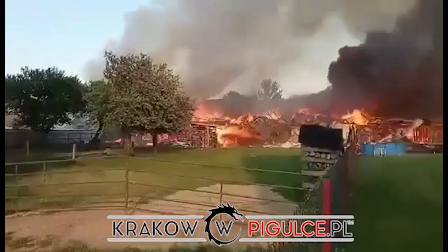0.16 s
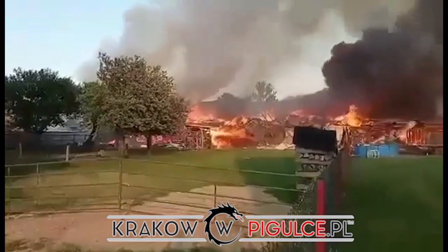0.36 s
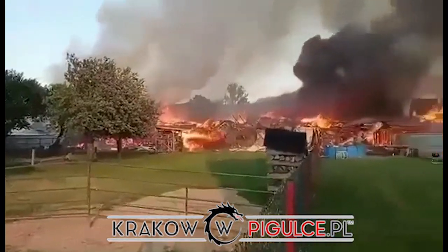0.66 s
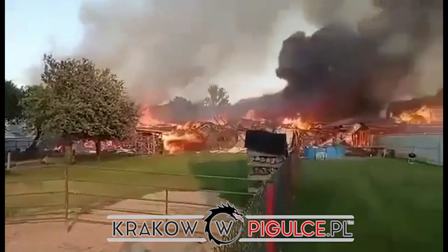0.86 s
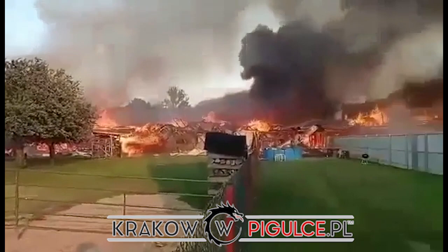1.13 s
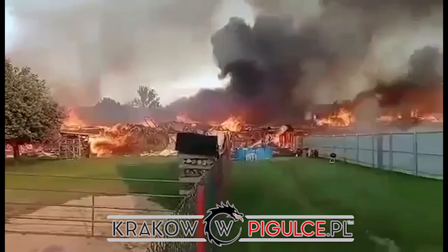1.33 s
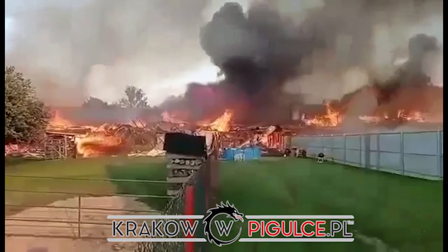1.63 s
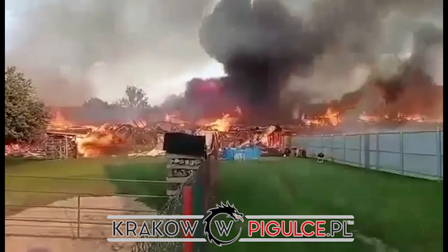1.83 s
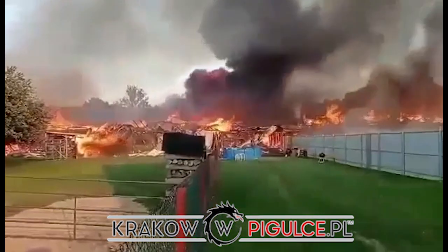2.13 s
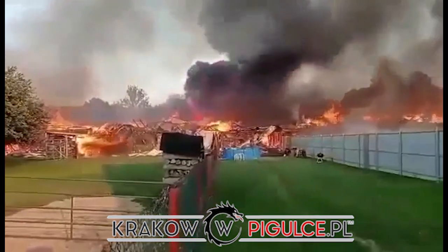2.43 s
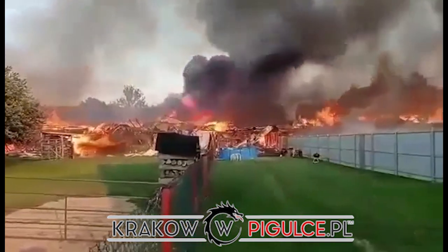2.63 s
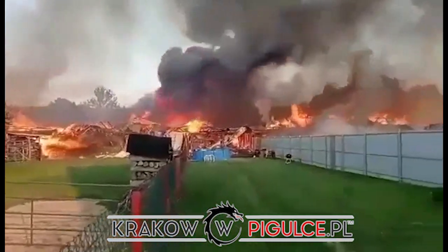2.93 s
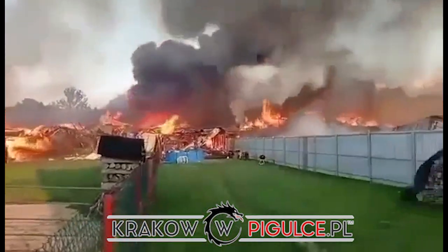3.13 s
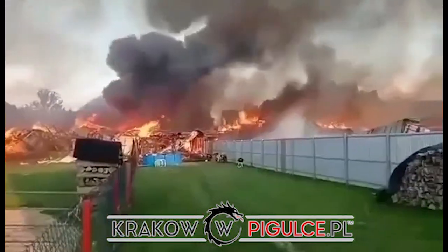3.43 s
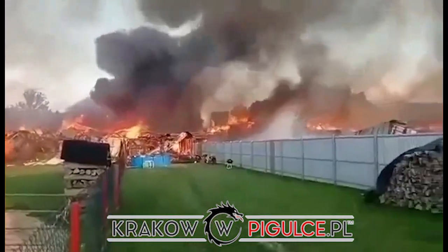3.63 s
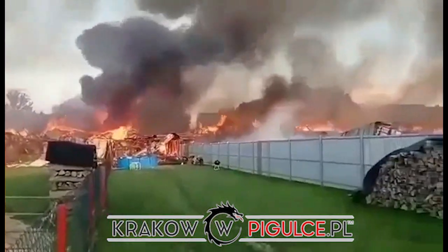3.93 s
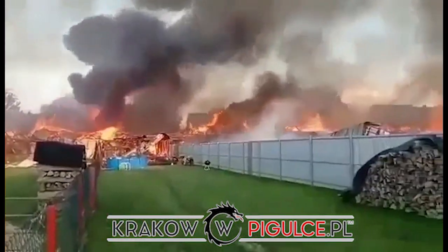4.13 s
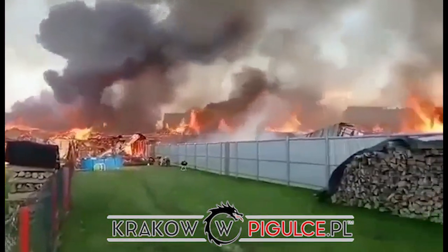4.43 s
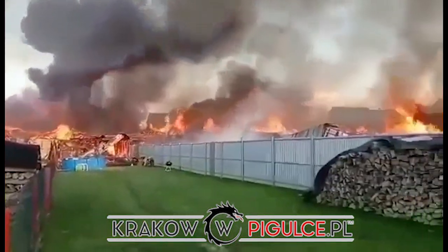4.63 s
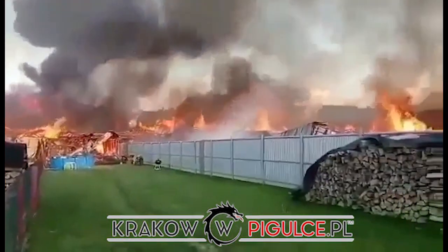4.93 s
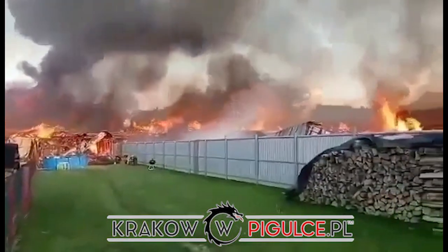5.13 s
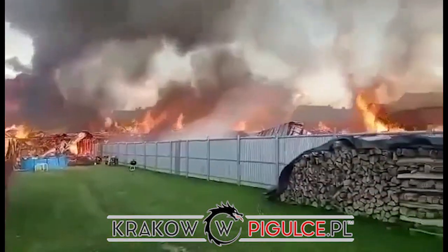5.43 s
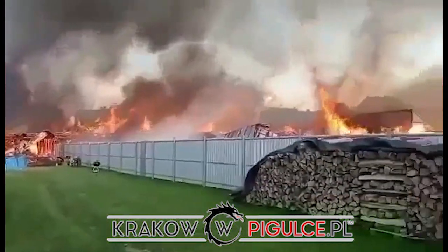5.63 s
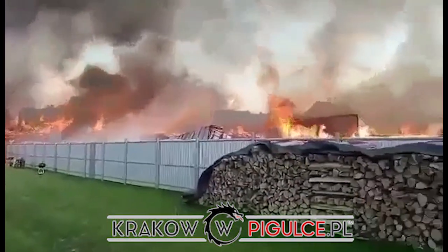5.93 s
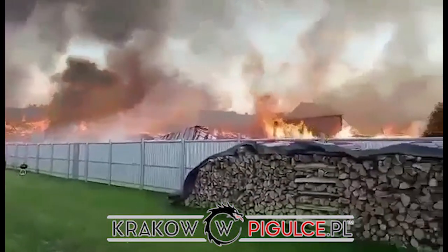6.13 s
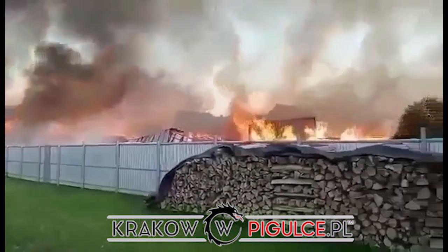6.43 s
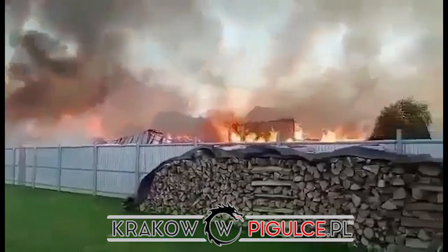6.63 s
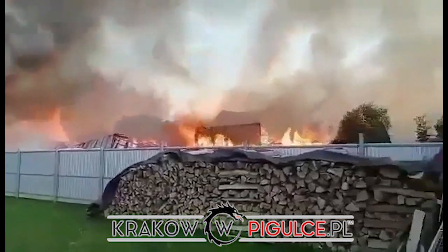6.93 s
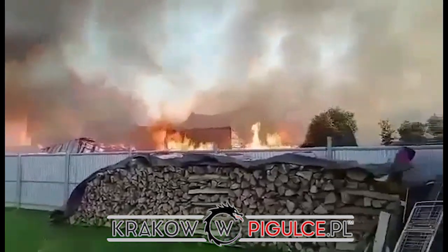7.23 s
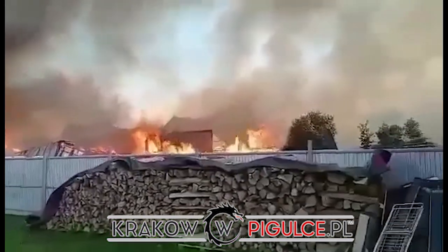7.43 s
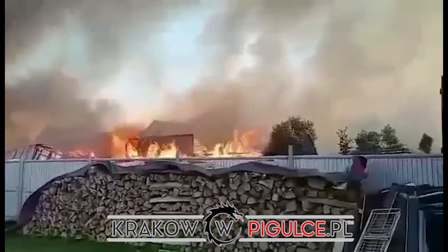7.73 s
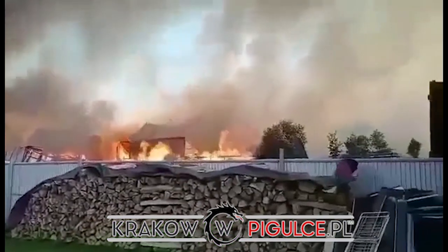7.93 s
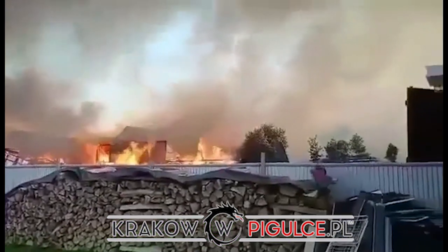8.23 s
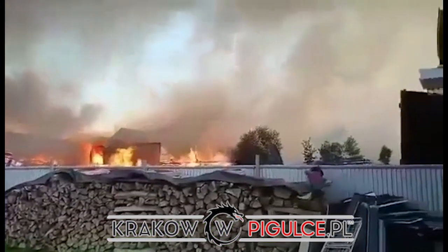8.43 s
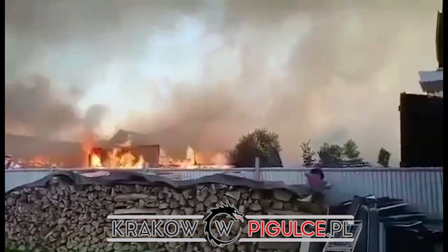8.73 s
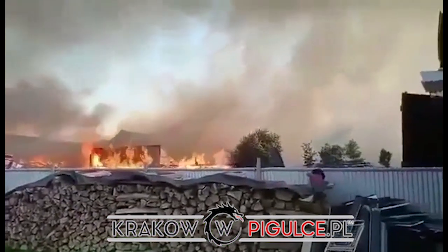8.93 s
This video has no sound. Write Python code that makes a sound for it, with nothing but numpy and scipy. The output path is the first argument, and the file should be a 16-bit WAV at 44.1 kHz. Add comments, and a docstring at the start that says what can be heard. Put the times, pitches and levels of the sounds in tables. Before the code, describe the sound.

Burning wooden wreckage roars steadily outdoors, its dense crackling hiss broken by dry snaps, dull thuds and short airy puffs of flame.

```python
"""Rumble, roar and timber hiss of burning wooden wreckage, some way off across a yard, in two equal channels.
Flames are coloured noise that surges; countless tiny ringing fractures and a noise wash make the hiss.
Debris knocks and low flame thuds are resonant noise bursts; snaps are a tick and ringing splinters with a tail.
Later one whoosh is heard twice, breaking off the first time: an airy noise band, then a hollow one.
The listener turns from the open yard towards a sheet fence, which recolours the flames and the hiss."""
import sys
import numpy as np
from scipy import signal
from scipy.fft import rfft, irfft, next_fast_len
from scipy.io import wavfile

SR = 44100
rng = np.random.default_rng(int(sys.argv[2]) if len(sys.argv) > 2 else 0)


def dump(signal):
    """Clip the signal to [-1, 1] and save it as 16-bit WAV at the path in sys.argv[1]."""
    limited = np.clip(np.atleast_2d(signal).T, -1, 1)
    pcm = np.round(limited * 32767).astype(np.int16)
    wavfile.write(sys.argv[1], SR, pcm)


N = 399987
TIME = np.arange(N) / SR

# the listener turns from the open yard to the fence: (time [s], share of the fence colour [0-1])
TURN = [(3.3, 0), (4.0, 0.92)]
# relative spectra of flames and hiss, over the open yard and over the fence: (frequency [Hz], density [dB])
RUMBLE_OPEN = [(25, -39), (38, -29.5), (52, -8), (80, 2), (150, 2), (230, -0.5), (330, -4), (480, -24),
               (900, -58)]
RUMBLE_FENCE = [(25, -27.5), (38, -19), (52, -7), (80, 3.5), (150, 3), (230, 0), (330, -5), (480, -17),
                (900, -51)]
ROAR_OPEN = [(220, -17.5), (380, 2.5), (500, -1), (750, 6), (1050, -0.5), (1400, -2.5), (1900, -6.5),
             (3000, -52)]
ROAR_FENCE = [(220, -16.5), (360, -1), (500, -2), (720, 0.5), (1050, -3), (1400, -7), (1900, 2),
              (3000, -52.5)]
HISS_OPEN = [(700, -11.5), (1250, -7.5), (1700, -7.5), (2000, -3), (2300, -0.5), (2900, -4), (3600, -4.5),
             (4300, -6.5), (5000, -9.5), (6500, -7.5), (7100, -14.5), (7700, -22.5), (8300, -64.5)]
HISS_FENCE = [(700, -16.5), (1400, -13), (1700, -8), (2000, -0.5), (2250, 3), (2550, 1.5), (2950, -5),
              (3600, -5), (4300, -2.5), (5100, -6.5), (6600, -2.5), (7100, -11.5), (7700, -18), (8300, -63)]

# steady flames, before the offsets given in scene(): (time [s], rumble level [dB], roar level [dB])
BLAZE = [(0.0, -42, -44), (0.35, -39.5, -43.5), (1.16, -43.5, -45), (2.65, -44.5, -42.5),
         (4.02, -43, -43.5), (4.92, -44.5, -44), (7.7, -45, -44), (8.79, -40, -42.5), (9.07, -42.5, -40.5)]
# low surges of flame: (time of full height [s], hold [s], rumble level [dB])
SURGES = [(0.18, 0.065, -32), (0.31, 0.057, -35.5), (0.558, 0.052, -35), (0.815, 0.046, -37),
          (1.017, 0.021, -33.5), (1.287, 0.11, -40.5), (1.46, .06, -39.5), (1.62, .04, -36.5),
          (3.96, 0.06, -40), (4.07, 0.085, -39), (7.858, 0.022, -36.5), (8.232, .02, -38.5),
          (8.44, .04, -39), (8.57, 0.011, -35.5), (8.69, 0.09, -30.5), (8.955, 0.048, -31)]
# rushes of burning gas: (time of full height [s], hold [s], roar level [dB])
RUSHES = [(0.126, 0.12, -42), (1.67, 0.048, -41), (3.15, 0.024, -38.5), (4.052, 0.067, -42)]
# steady timber and steam, before the offsets in scene(): (time [s], crackle level [dB], sizzle level [dB])
TIMBER = [(0.0, -37.5, -40.5), (0.75, -37, -40.5), (1.24, -38, -38.5), (2.37, -38.5, -41),
          (2.73, -37.5, -38.5), (5.02, -37.5, -38.5), (5.53, -39, -39.5), (5.86, -37.5, -38.5),
          (6.97, -37.5, -38), (7.43, -39, -40), (8.66, -36.5, -38), (9.07, -38, -39)]
# flurries of fiercer cracking: (time of full height [s], hold [s], rise of the crackle [dB])
FLURRIES = [(0.37, 0.21, 2), (1.75, 0.043, 5), (2.0, 0.087, 4), (3.0, 0.19, 1.5), (3.99, 0.13, 4),
            (4.2, 0.052, 4.5), (4.68, 0.054, 2), (4.97, 0.094, 0.5), (7.72, 0.089, 3)]
# knocks of falling debris, and low thuds and puffs of the flames:
# (time [s], peak level [dB], pitch [Hz], bandwidth [octaves], decay [s])
KNOCKS_AND_THUDS = [(0.151, -24.5, 755, .9, .0092), (0.152, -24, 240, 1.0, .012),
                    (0.194, -17, 250, 1.0, .018), (0.902, -25.5, 1000, 1.1, .0034),
                    (1.008, -25, 800, .7, .03), (1.02, -28, 115, 1.0, .02), (1.172, -20.5, 175, 1.3, .016),
                    (1.284, -25, 160, 1.0, .01), (1.325, -24.5, 155, 1.0, .012),
                    (1.376, -20.5, 180, 1.4, .016), (3.1345, -18, 880, .7, .011),
                    (3.137, -29, 280, 1.6, .022), (3.324, -21.5, 260, 2.4, .004),
                    (3.327, -26, 760, 1.2, .008), (3.34, -27.5, 600, 1.7, .018),
                    (3.354, -22.5, 810, .85, .008), (3.368, -28, 680, 1.0, .004),
                    (4.078, -29, 100, 1.2, .02), (4.135, -28, 92, 1.1, .02), (5.350, -26, 300, .7, .012),
                    (8.683, -17, 185, 2.4, .012), (8.737, -18, 190, 1.6, .03),
                    (8.814, -23.5, 310, .8, .0058), (8.961, -21, 200, 2.4, .008),
                    (8.988, -20.5, 190, 2.2, .012)]
# loud timber snaps: (time [s], rms level of the first 3 ms before SNAP_DB [dB], lower ring [Hz],
# upper ring [Hz], upper ring against lower [dB], ring bandwidth [octaves], splinter decay [ms])
SNAPS = [(0.152, -28.5, 1900, 3200, -6, .6, .6), (0.1637, -29.5, 1900, 2900, -4, .5, 1.0),
         (0.3625, -25.5, 2150, 3000, -12, .3, .6), (0.398, -29.3, 2400, 3000, -2, .3, .6),
         (0.4812, -29, 1900, 2400, -3, .4, .8), (0.7386, -21, 2050, 3900, -8, .5, .5),
         (0.8049, -23.5, 2250, 3500, -1, .45, .5), (0.9266, -30, 2400, 3000, -4, .3, .6),
         (0.9773, -30, 2400, 3300, -3, .4, .6), (1.0037, -30, 2700, 3800, -2, .6, .8),
         (1.2302, -21, 3300, 4100, 3, .24, .6), (1.3564, -31, 3600, 4400, -2, .4, .8),
         (1.567, -29.5, 2600, 3200, 0, .25, .5), (1.7026, -31, 2900, 4400, 0, .4, .8),
         (1.9243, -29, 3400, 4400, -2, .3, .7), (2.3433, -22.5, 2300, 3100, -4, .45, .7),
         (2.4506, -22, 2100, 2950, -1, .6, .6), (2.4699, -30, 2400, 3100, -2, .4, .8),
         (2.7879, -29.5, 2600, 3700, 0, .4, .6), (2.8774, -26, 2400, 4000, -5, .7, .4),
         (2.9865, -29.5, 2000, 3900, -1, .5, .6), (3.0705, -26, 2500, 4600, -3, .8, .7),
         (3.081, -30, 2300, 3000, -5, .4, .6), (3.140, -30.5, 1900, 2500, -3, .4, 2.0),
         (3.5105, -30, 1900, 2300, -1, .3, 1.0), (3.9446, -26, 2050, 4700, -2, .6, 1.0),
         (4.2108, -30, 1900, 4100, 0, .5, .8), (4.218, -26, 2900, 3600, 2, .3, 1.3),
         (4.333, -30, 2000, 4200, 4, .35, 1.0), (4.667, -29.5, 2400, 3100, -2, .4, .6),
         (4.695, -24, 4150, 5750, 1, .22, .8), (4.7038, -27.5, 2250, 4300, -12, .3, 1.0),
         (5.0157, -27.5, 2300, 4700, -3, .25, .6), (5.0304, -27.5, 2200, 4000, -7, .3, .6),
         (5.1222, -25.8, 2200, 2600, -9, .25, .6), (5.3951, -23, 2900, 4750, 2, .4, 1.4),
         (5.4225, -29.5, 5900, 6500, 0, .25, 1.8), (7.816, -32, 4600, 6500, 0, .35, .8),
         (7.8817, -26.2, 2200, 6100, 4, .4, .6), (7.9093, -23, 4500, 6500, 4, .35, .6),
         (7.9738, -30, 2000, 2400, -2, .3, .6), (8.1488, -28.5, 4600, 6500, 4, .35, 1.8),
         (8.2036, -30.5, 2300, 4700, 0, .5, 1.0), (8.3462, -28.5, 3600, 6300, -5, .4, 1.2),
         (8.704, -26.5, 2500, 4450, -1, .35, 1.3), (8.8415, -25.5, 2950, 5900, -2, .4, 1.6),
         (8.8492, -20.3, 2750, 5900, -7, .55, .6), (8.9761, -25, 2800, 5500, -4, .7, 1.8),
         (8.995, -29, 2700, 3600, 0, .4, 2.0), (9.0565, -26, 2250, 2600, -8, .25, .8)]
# one whoosh heard twice, breaking off the first time:
# (time of full height [s], hold [s], release [s], level [dB])
WHOOSHES = [(5.805, 0.025, 0.0051, -34.5), (7.736, 0.037, 0.05, -35)]

SWELL_ATTACK_S, SWELL_RELEASE_S = 0.03, 0.018
REPEAT_FROM_S, REPEAT_S = 3.9, 1.9333  # a run of events is heard twice in a row: its start and length
FULL_SURGE_DB, FLARE_GROWTH = -26, 2.2  # flare against rumble gains this many dB per dB of surge
SPLIT_HZ = 2605  # crackle below, sizzle above
SIZZLE_FOLLOWS = 0.032  # share of a flurry's rise, in dB, that reaches the sizzle
SNAP_DB = -0.3  # offset of all snaps
SCATTER_DB, SCATTER_S = -7.5, .009  # tail against the direct snap, and its decay
# faint snaps at random times; their mean level is before SNAP_DB
FAINT_PER_S, FAINT_DB, FAINT_SPREAD_DB = 3, -37, 1.5
FAINT_HZ, FAINT_OCTAVES = 2400, .22  # median lower ring and its spread
FAINT_WIDTH_OCTAVES, FAINT_DECAY_MS = .35, .8
FAINT_UPPER_RATIO, FAINT_UPPER_DB = 1.8, -2  # upper ring against the lower
WHOOSH_AIR_HZ, WHOOSH_BODY_HZ, WHOOSH_BODY_LAG_S = 867, 301, 0.0059
CUTOFF_HZ = 8050  # top of the recorded band


def from_db(db):
    """Decibels to gain."""
    return 10 ** (np.asarray(db) / 20)


def rms_one(x):
    """Scale to rms 1."""
    return x / np.sqrt(np.mean(x ** 2) + 1e-20)


def in_time(rows):
    """Each column of a curve at every sample."""
    times, *columns = np.transpose(rows)
    return [np.interp(TIME, times, column) for column in columns]


def coloured(x, spectrum):
    """Give a signal a spectrum, causally, so that every click keeps its sharp front; rms 1."""
    hz, db = np.transpose(spectrum)
    size = next_fast_len(N + SR // 4, True)
    grid = np.maximum(np.fft.rfftfreq(size, 1 / SR), 1)
    gain = from_db(np.interp(np.log(grid), np.log(hz), db))
    # folding the cepstrum onto positive time gives minimum phase
    cepstrum = irfft(np.log(gain), size)
    cepstrum[size // 2:] = 0
    response = np.exp(2 * rfft(cepstrum))
    return rms_one(irfft(rfft(x, size) * response, size)[:N])


def turning(x, open_yard, fence):
    """The colour of a sound changes with the way the listener faces."""
    share = in_time(TURN)[0]
    return (1 - share) * coloured(x, open_yard) + share * coloured(x, fence)


def drift(rate_hz):
    """Slow random wander with spread 1, drawn at every 40th sample."""
    step = 40
    r = np.exp(-2 * np.pi * rate_hz * step / SR)
    noise = rng.standard_normal(N // step + 2002)
    slow = signal.lfilter([1], [1, -2 * r, r * r], noise)[2000:]  # drop the filter's start-up
    return np.interp(np.arange(N) / step, np.arange(len(slow)), rms_one(slow))


def resonance(x, hz, octaves, order):
    """A broad resonance around a pitch."""
    edges = np.clip([hz * 2 ** (-octaves / 2), hz * 2 ** (octaves / 2)], 10, SR / 2 - 10)
    return signal.sosfilt(signal.butter(order, edges, "band", fs=SR, output="sos"), x)


def add(out, s, sound):
    """Mix a sound in at a time in seconds."""
    at = max(round(s * SR), 0)
    out[at:at + len(sound)] += sound[:max(N - at, 0)]


def with_repeat(rows):
    """All events, with those of the repeated run played once more."""
    run_end_s = REPEAT_FROM_S + REPEAT_S
    again = [(s + REPEAT_S, *rest) for s, *rest in rows if REPEAT_FROM_S <= s < run_end_s]
    return list(rows) + again


def swell(s, hold_s, release_s=SWELL_RELEASE_S):
    """Linear build-up to a time, hold, exponential release; height 1."""
    rise = np.clip(1 + (TIME - s) / SWELL_ATTACK_S, 0, 1)
    return rise * np.exp(-np.clip((TIME - s - hold_s) / release_s, 0, 20))


def swelling(steady_db, swells):
    """Level in dB of a steady sound with the power of its swells added."""
    power = from_db(steady_db) ** 2
    for s, hold_s, db in with_repeat(swells):
        power = power + (from_db(db) * swell(s, hold_s)) ** 2
    return 10 * np.log10(power)


def flames(rumble_db, roar_db, flutter_db, flare_db, roar_flutter_db):
    """Turbulent flame: a lumpy rumble that brightens in strong surges, under a broad roar."""
    steady_rumble_db, steady_roar_db = in_time(BLAZE)
    surge_db = swelling(steady_rumble_db + rumble_db, SURGES)
    rush_db = swelling(steady_roar_db + roar_db, RUSHES)

    rumble = turning(rng.standard_normal(N), RUMBLE_OPEN, RUMBLE_FENCE)
    rumble = rms_one(rumble * from_db(flutter_db * drift(24)))
    flare = rms_one(resonance(rng.standard_normal(N), 390, 1.0, order=2))
    flare = flare * from_db(flare_db + FLARE_GROWTH * (surge_db - FULL_SURGE_DB))
    roar = turning(rng.standard_normal(N), ROAR_OPEN, ROAR_FENCE)
    roar = rms_one(roar * from_db(roar_flutter_db * drift(28)))
    return from_db(surge_db) * (rumble + flare) + from_db(rush_db) * roar


def cracks(per_s, spread_db, clump_db, width):
    """Random tiny fractures in clumps, most weak, a few strong, each ringing briefly at one of 16 pitches."""
    born = rng.random(N) < per_s * from_db(clump_db * drift(18)) / SR
    strengths = from_db(spread_db * np.minimum(rng.exponential(1, N), 4.5))
    clicks = born * strengths * rng.choice([-1, 1], N)
    pitches = np.geomspace(1300, 7500, 16)
    dealt = rng.integers(0, len(pitches), N)
    rings = np.zeros(N)
    for k, hz in enumerate(pitches):
        rings += resonance(clicks * (dealt == k) + 1e-18, hz, width, order=2)
    return rms_one(rings)


def burning_wood(crackle_db, sizzle_db, flicker_db, spit_db, wash_db):
    """Near cracks stay grainy, far ones blur into a wash; both feed the crackle and the sizzle above it."""
    cracking_db, steaming_db = in_time(TIMBER)
    flurry_db = sum(rise_db * swell(s, hold_s) for s, hold_s, rise_db in with_repeat(FLURRIES))

    near = cracks(per_s=1800, spread_db=3.0, clump_db=3.5, width=0.38)
    far = from_db(wash_db) * rng.standard_normal(N)
    hiss = turning(near + far, HISS_OPEN, HISS_FENCE) * from_db(flicker_db * drift(47))

    # each half of the split is filtered twice for a steeper edge
    low, high = [signal.butter(2, SPLIT_HZ, side, fs=SR, output="sos") for side in ("low", "high")]
    crackle = rms_one(signal.sosfilt(low, signal.sosfilt(low, hiss)))
    sizzle = rms_one(signal.sosfilt(high, signal.sosfilt(high, hiss)))
    sizzle = sizzle * from_db(spit_db * drift(23))  # steam escapes unevenly
    crackle_level_db = cracking_db + crackle_db + flurry_db
    sizzle_level_db = steaming_db + sizzle_db + SIZZLE_FOLLOWS * flurry_db
    return from_db(crackle_level_db) * crackle + from_db(sizzle_level_db) * sizzle


def knocks_and_thuds(rise_s, first_pulse):
    """Knocks of falling debris, and low thuds and puffs of the flames: a noise burst after a firm first pulse."""
    out, t = np.zeros(N), TIME[:SR // 4]
    for s, db, hz, width, decay_s in with_repeat(KNOCKS_AND_THUDS):
        burst = rng.standard_normal(len(t)) * np.exp(-t / decay_s) * (1 - np.exp(-t / rise_s))
        struck = burst / np.linalg.norm(burst) + first_pulse * (t == 0)
        ringing = resonance(struck, hz, width, order=3)
        add(out, s, from_db(db) * ringing / np.abs(ringing).max())
    return out


def faint_snaps():
    """Small snaps at random times, each with a strength and pitch of its own, as rows like SNAPS."""
    times = TIME[rng.random(N) < FAINT_PER_S / SR]
    strengths, pitches = rng.standard_normal((len(times), 2)).T
    levels_db = FAINT_DB + FAINT_SPREAD_DB * strengths
    lower_hz = FAINT_HZ * 2 ** (FAINT_OCTAVES * pitches)
    return [(s, db, hz, FAINT_UPPER_RATIO * hz, FAINT_UPPER_DB, FAINT_WIDTH_OCTAVES, FAINT_DECAY_MS)
            for s, db, hz in zip(times, levels_db, lower_hz)]


def splinter_ring(x, hz, width):
    """One resonance of a breaking splinter, with steep skirts; rms 1."""
    return rms_one(resonance(resonance(x, hz, width, order=1), hz, 1.15, order=2))


def two_rings(x, lower_hz, upper_hz, upper_db, width):
    """A splinter rings at two pitches; opposite signs fill the gap between them."""
    return splinter_ring(x, lower_hz, width) - from_db(upper_db) * splinter_ring(x, upper_hz, width)


def snaps(splinter_db, tick_db):
    """A fibre breaks with one bright tick and a brief splintering; fences and rubble scatter a faint tail."""
    out, t = np.zeros(N), TIME[:SR // 8]
    air = signal.butter(10, 7150, fs=SR, output="sos")  # low-pass: dulls the extreme treble
    tick = rms_one(resonance((t == 0) + 1e-18, 5600, 1.0, order=2))
    for s, db, lower_hz, upper_hz, upper_db, width, decay_ms in with_repeat(SNAPS) + faint_snaps():
        splinters, scatter = rng.standard_normal((2, len(t)))
        burst = splinters * np.exp(-t * 1000 / decay_ms)
        burst = from_db(splinter_db) * burst / np.linalg.norm(burst) + (t == 0)
        tail = scatter * np.exp(-t / SCATTER_S)
        direct = rms_one(two_rings(burst, lower_hz, upper_hz, upper_db, width))
        scattered = rms_one(two_rings(tail, lower_hz, upper_hz, upper_db, width))
        snap = direct + from_db(tick_db) * tick + from_db(SCATTER_DB) * scattered
        snap = signal.sosfilt(air, snap)
        first = snap[:SR * 3 // 1000]  # 3 ms sets the level
        add(out, s, from_db(db + SNAP_DB) * snap / np.sqrt(np.mean(first ** 2)))
    return out


def whooshes(air_width, body_db, body_width):
    """A whoosh is an airy noise band first, with a hollow body just behind."""
    air = rms_one(resonance(rng.standard_normal(N), WHOOSH_AIR_HZ, air_width, order=2))
    body = rms_one(resonance(rng.standard_normal(N), WHOOSH_BODY_HZ, body_width, order=2))
    body = from_db(body_db) * body
    out = np.zeros(N)
    for s, hold_s, release_s, db in WHOOSHES:
        airy = air * swell(s, hold_s, release_s)
        hollow = body * swell(s + WHOOSH_BODY_LAG_S, hold_s, release_s)
        out += from_db(db) * (airy + hollow)
    return out


def scene():
    """The whole fire, alike in both channels."""
    fire = flames(rumble_db=2.5, roar_db=2.0, flutter_db=1.0, flare_db=-3.5, roar_flutter_db=1.5)
    fire = fire + burning_wood(crackle_db=-2.5, sizzle_db=-1.73, flicker_db=0.83, spit_db=1.3, wash_db=7.0)
    fire = fire + knocks_and_thuds(rise_s=0.00019, first_pulse=0.44)
    fire = fire + snaps(splinter_db=1.0, tick_db=-16.5)
    fire = fire + whooshes(air_width=1.4, body_db=-2.5, body_width=.75)
    return np.array([fire, fire])


def record(dry):
    """The recorder behind the microphone cuts the top off steeply."""
    return signal.sosfilt(signal.ellip(10, .2, 70, CUTOFF_HZ, fs=SR, output="sos"), dry)


dry = scene()
out = record(dry)
dump(out)
```